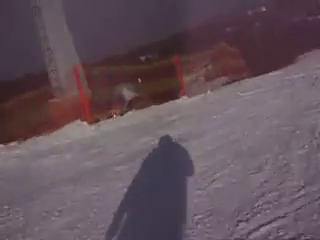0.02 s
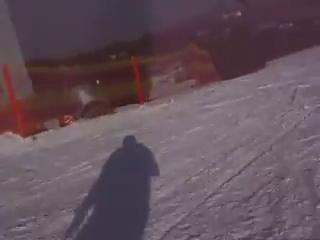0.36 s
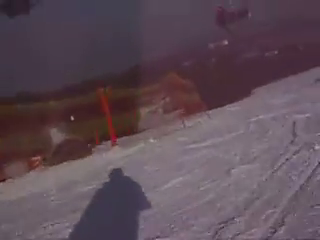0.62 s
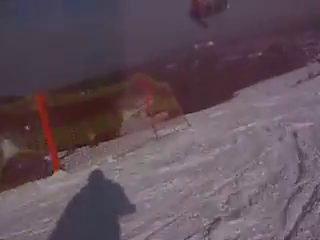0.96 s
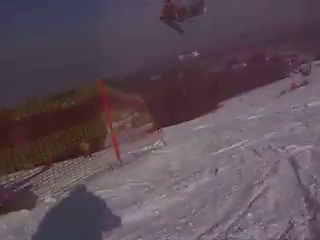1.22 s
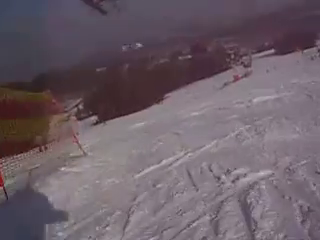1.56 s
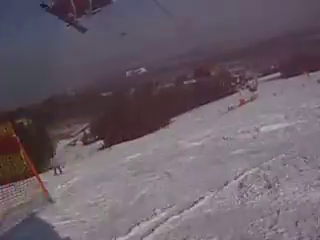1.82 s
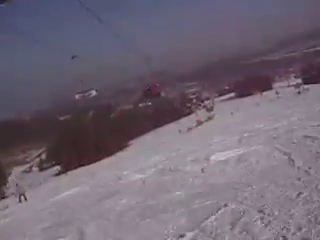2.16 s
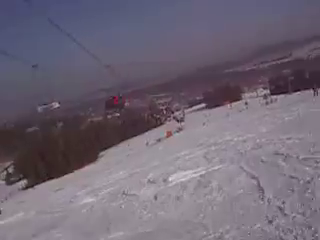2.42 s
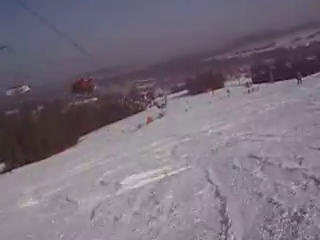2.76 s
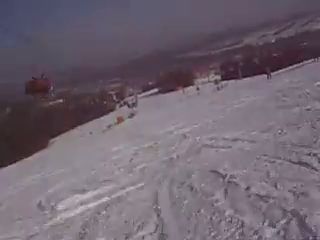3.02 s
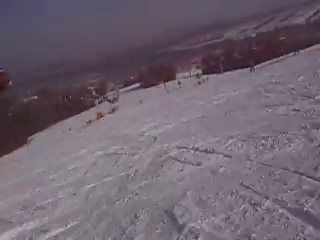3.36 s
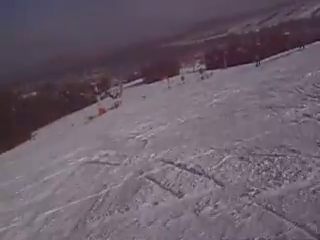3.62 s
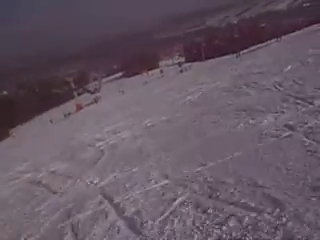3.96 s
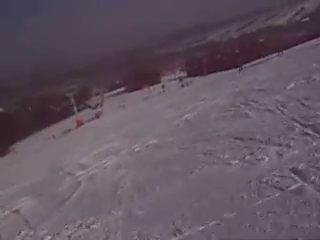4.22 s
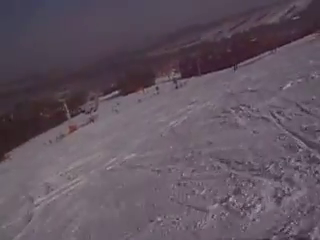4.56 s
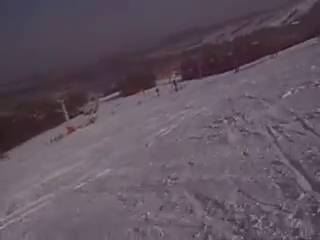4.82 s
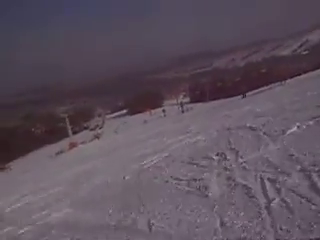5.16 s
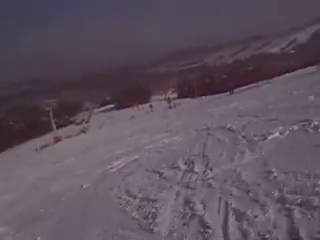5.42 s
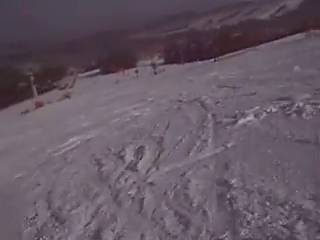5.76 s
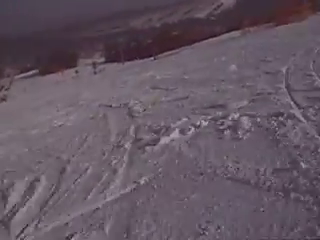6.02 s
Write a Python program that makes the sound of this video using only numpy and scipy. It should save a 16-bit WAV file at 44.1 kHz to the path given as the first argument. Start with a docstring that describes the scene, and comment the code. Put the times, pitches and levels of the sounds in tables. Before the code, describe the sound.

Wind rumbles and flutters hard against a small microphone carried down a ski slope, overloading it with thumps and a thin crackle. Underneath, skis hiss and scrape over hard-packed snow, faint at first and clearer as they gather speed, with a few small knocks and icy rasps. Near the end one violent gust hits, the whole sound drops suddenly, then creeps back up. The tone is dull and muffled.

```python
"""Skiing into the wind

A skier carries a small camera down a hard-packed slope. The skis hiss, scrape and chatter as the
crust breaks under their edges, while wind buffets the microphone and overloads it. One violent gust
trips the recorder's gain control, which ducks everything and creeps back. The recorder is dull:
above about 4 kHz there is only the thin crackle of its own clipping."""
import sys
import numpy as np
from scipy import signal
from scipy.io import wavfile
from scipy.ndimage import uniform_filter1d

SR = 44100
rng = np.random.default_rng(int(sys.argv[2]) if len(sys.argv) > 2 else 0)


def bounce(signal):
    """Save signal as a 16-bit WAV file at the path given by the first command-line argument."""
    frames = np.transpose(np.atleast_2d(signal))
    limited = np.clip(frames, -1, 1)
    pcm = np.round(limited * 32767).astype(np.int16)
    wavfile.write(sys.argv[1], SR, pcm)


N = 272538

# single gusts that hit the microphone port head on: (time [s], push level [dB], pitch [Hz])
HEAD_ON_GUSTS = [(0.126, -5, 420), (0.274, -12, 400), (0.505, -2.5, 300), (0.736, 3, 297), (0.76, 0, 260),
                 (.948, -2, 260), (1.349, -2, 238), (1.998, -3, 280), (2.978, -8, 151), (4.599, -7, 200),
                 (4.629, -12, 298), (4.687, -1.5, 241), (4.9855, 27, 206), (5.352, -2, 240),
                 (5.457, -11, 346), (5.635, -4, 300), (5.818, 4.5, 180)]


def from_db(db):
    """Decibels to gain."""
    return 10 ** (np.asarray(db) / 20)


def unit_power(x):
    """Scale to a mean power of 1."""
    return x / np.sqrt(np.mean(x ** 2) + 1e-20)


def seconds():
    """The time of every sample."""
    return np.arange(N) / SR


def fader(points):
    """Gain along a curve of (time [s], level [dB])."""
    return from_db(np.interp(seconds(), *np.transpose(points)))


def drift(rate):
    """A smooth random wobble that changes about `rate` times a second; spread 1."""
    pole = np.exp(-20 * np.pi * rate / SR)
    slow = signal.lfilter([1], [1, -2 * pole, pole * pole], rng.standard_normal(N // 10 + 4002))[4000:]
    return np.interp(np.arange(N) / 10, np.arange(len(slow)), unit_power(slow))


def steady(x, span_s=0.06):
    """Level a texture to unit power over every short span, leaving the quick lumps in."""
    power = uniform_filter1d(uniform_filter1d(x * x, int(span_s * SR)), int(span_s * SR / 2))
    return x / np.sqrt(np.maximum(power, 1e-20))


def coloured(sources, colour):
    """Shape two unrelated sources with an EQ curve; they feed alternate bands of a filter bank."""
    edges = np.geomspace(22, 4800, 21)
    hz, db = np.transpose(colour)
    out = np.zeros(N)
    for k, (low, high) in enumerate(zip(edges, edges[1:])):
        band = signal.sosfilt(signal.butter(2, [low, high], "band", fs=SR, output="sos"), sources[k % 2])
        out += band * from_db(np.interp(np.log(low * high) / 2, np.log(hz), db))
    return unit_power(out)


def resonate(x, hz, width):
    """A resonance with gain 1 at its peak."""
    pole = np.exp(-np.pi * width / SR)
    feedback = [1, -2 * pole * np.cos(2 * np.pi * hz / SR), pole * pole]
    return signal.lfilter(np.array([1, 0, -1]) * (1 - pole * pole) / 2, feedback, x)


def edge_bite(uneven_db=1.3, attack_share=0.62):
    """How hard the edges bite: a glide over uneven snow, and scrapes that swell and let go."""
    # the hiss of the glide, rising as the skis gather speed: (time [s], relative level [dB])
    glide = [(0, -37.5), (.8, -34.5), (1.3, -33.5), (1.85, -36.5), (2.4, -27.5), (3.1, -29), (3.55, -26),
             (4.02, -31.5), (4.4, -28.5), (5.2, -29), (6.18, -31)]
    # the edges dig in: (time of the hardest bite [s], relative level [dB], release [s])
    scrapes = [(.97, -34.5, .06), (1.12, -34, 0.12), (1.38, -30, .12), (1.70, -32.5, .1), (1.99, -30, 0.1),
               (2.548, -23, 0.062), (2.73, -32, 0.018), (3.28, -21.5, 0.14), (3.72, -22.5, 0.1),
               (4.23, -26.5, 0.14), (4.86, -24.5, 0.1), (5.30, -25.5, 0.057), (5.56, -27.5, .05),
               (5.73, -27.5, 0.13)]
    power = (fader(glide) * from_db(uneven_db * drift(8.4))) ** 2
    for time, db, release in scrapes:
        age = seconds() - time
        width = np.where(age < 0, attack_share * release, release)
        power += from_db(db) ** 2 * np.exp(-(age / width) ** 2)
    return np.sqrt(power)


def skis(bite_db=3.0, grain_db=3.0, grains_per_s=2000, powder=0.62, flex_db=4.4, judder_db=1.0):
    """Crust breaks in countless grains under the edges, over a powder hiss; the edges judder and knock."""
    # the tone of the snow: (frequency [Hz], relative level [dB])
    snow_colour = [(25, -24), (250, 0.5), (500, 6), (900, 3.5), (1300, 3), (1700, -1), (2150, 0),
                   (2550, -3), (3300, -8.5), (4000, -9)]
    # resonances that swell and fade as the skis flex: (frequency [Hz], width [Hz], level [dB])
    ski_modes = [(585, 40, -3), (977, 60, -3), (1908, 60, -2.5), (2210, 89, -8.5), (2940, 140, -7),
                 (3260, 280, -12.5)]
    # knocks over icy lumps: (time [s], level [dB], decay [s])
    knocks = [(0.198, -25, 0.0096), (.577, -30, 0.0043), (.597, -31, 0.0065), (.944, -23, 0.0045),
              (1.694, -28, 0.012), (1.934, -30, 0.0041), (2.057, -10, 0.0021), (2.545, -21.5, 0.013),
              (3.177, -14.5, 0.0033), (4.18, -23, 0.0041), (4.237, -13.5, 0.0079), (4.250, -21, 0.0034),
              (5.277, -23, 0.028)]
    grains = from_db(grain_db * np.minimum(rng.exponential(1, (2, N)), 5)) * rng.choice([-1, 1], (2, N))
    crust = unit_power(grains * (rng.random((2, N)) < grains_per_s / SR))
    snow = coloured(crust + powder * rng.standard_normal((2, N)), snow_colour)
    ring = sum(from_db(db + flex_db * drift(6.4)) * resonate(snow, hz, width)
               for hz, width, db in ski_modes)
    bite = from_db(bite_db) * edge_bite()
    for time, db, decay in knocks:
        age = seconds() - time
        bite += from_db(db) * (age > 0) * np.exp(-np.abs(age) / decay)
    judder = from_db(judder_db * drift(49))
    return bite * steady((snow + ring) * judder)


def ice_rasps():
    """Stick and slip on ice swell briefly around one resonance of the ski."""
    # an edge catches: (time [s], level [dB], half-length [s], frequency [Hz], width [Hz])
    catches = [(1.696, -27.5, 0.025, 1880, 160), (2.576, -18.5, 0.047, 570, 90),
               (4.238, -24.5, 0.019, 2140, 300), (4.836, -26.5, 0.037, 3200, 800)]
    friction = rng.standard_normal(N)
    out = np.zeros(N)
    for time, db, half_length, hz, width in catches:
        swell = np.exp(-((seconds() - time) / half_length) ** 2)
        out += from_db(db) * swell * steady(resonate(friction, hz, width))
    return out


def wind(buffet_db=-12.5, rumble_db=-11.0, flutter_db=-23.0, shed_db=-13, shed_s=0.0035):
    """Turbulence arrives in lumps; each lump or gust presses on the port and sheds smaller eddies."""
    # the tones of deep, middling and small eddies: (frequency [Hz], relative level [dB])
    rumble_colour = [(25, -12), (45, -2.5), (75, 0), (120, -5), (250, -23), (4000, -79.5)]
    buffet_colour = [(25, -26), (50, -17.5), (90, -3), (145, 0.5), (250, -4), (350, -10.5), (500, -21.5),
                     (900, -42), (4000, -63.5)]
    flutter_colour = [(25, -42), (200, -12.5), (350, 1.5), (500, 2.5), (700, -2.5), (1000, -10.5),
                      (1500, -24), (2500, -38.5), (4000, -34)]
    # strength of the airflow over the microphone: (time [s], relative level [dB])
    airflow = [(0.0, -3.5), (0.15, 3.5), (0.3, -5), (0.39, 0.5), (1.17, 2.5), (1.26, -4.5), (1.35, 1.5),
               (1.41, -3.5), (1.53, 2), (1.89, -3.0), (2.07, 2.0), (2.55, -1), (2.82, -5.5), (2.91, -1),
               (3.11, -5), (3.26, -1), (4.04, 0), (4.49, -3), (4.61, 1.5), (4.79, -2.5), (4.97, 1.5),
               (5.24, -2.5), (5.33, 1), (6.17, -3.5)]
    # the deepest eddies swell as the camera turns across the airflow: (time [s], relative level [dB])
    rumble_swells = [(0, -12), (1.0, -15.5), (1.8, -17.5), (2.3, -15.5), (2.8, -4.5), (3.3, -5),
                     (3.7, -1.5), (4.2, -9), (4.7, -4), (5.1, -10), (5.6, -6.5), (6.18, -16)]
    lumps = drift(15.2)
    surge = from_db(1.5 * lumps)
    buffet = steady(coloured(rng.standard_normal((2, N)), buffet_colour) * surge)
    rumble = steady(coloured(rng.standard_normal((2, N)), rumble_colour), span_s=0.27)
    small_eddies = coloured(rng.standard_normal((2, N)), flutter_colour)
    flutter = steady(small_eddies * from_db(3.0 * lumps + 2.5 * drift(130)))
    flow, turn = fader(airflow), fader(rumble_swells)
    # buffet and flutter yield a little to the rumble; small eddies grow faster with the flow
    pressure = flow ** 0.99 * (from_db(buffet_db) / turn ** 0.09 * buffet
                               + from_db(rumble_db) * turn * rumble)
    tearing = flow ** 1.32 * from_db(flutter_db) / turn ** 0.1
    shed = sum(from_db(min(db, 0) + shed_db) * np.exp(-((seconds() - time) / shed_s) ** 2)
               for time, db, _ in HEAD_ON_GUSTS)
    return surge * pressure + (surge * tearing + shed) * flutter


def gusts(suction=0.38, lead_rad=2.1):
    """A head-on gust is a moment of suction, then one push of pressure."""
    out = np.zeros(N)
    for time, db, hz in HEAD_ON_GUSTS:
        phase = np.pi * hz * (seconds() - time)
        out += from_db(db) * (np.exp(-phase ** 2) - suction * np.exp(-(phase + lead_rad) ** 2 / 2))
    return out


def scene():
    """Wind and skis at the single microphone."""
    return (wind() + gusts() + skis() + ice_rasps())[None]


def overflow_snap(trough=0.85):
    """The converter overflows and jumps from rail to rail: a needle in a brief trough."""
    # the cue for the snap: (time [s], level before the band limit [dB], width [s])
    snaps = [(0.9604, 4, 0.000112)]
    out = np.zeros(N)
    for time, db, width in snaps:
        phase = (seconds() - time) / width
        needle = (1 + trough) * np.exp(-phase ** 2 / 2)
        out += from_db(db) * (needle - trough * np.exp(-(phase / 10) ** 2))
    return out


def gain_control(x, threshold_db=5, recovery_db_per_s=17):
    """A peak over the threshold ducks the gain at once; it then recovers at a steady rate."""
    excess = np.maximum(20 * np.log10(np.abs(x) + 1e-9) - threshold_db, 0)
    recovered = recovery_db_per_s * seconds()
    return x * from_db(recovered - np.maximum.accumulate(excess + recovered, axis=-1))


def record(dry, offset=-0.27, rail=0.71, hardness=26.5, headroom=1.003, band_hz=3900, top_hz=15800):
    """A narrow-band recorder with gain control; it sits off centre, so the troughs overload first."""
    biased = gain_control(dry) + offset
    saturated = biased / (1 + np.abs(biased / (headroom * rail)) ** hardness) ** (1 / hardness)
    narrow = signal.sosfilt(signal.butter(18, band_hz, fs=SR, output="sos"), saturated + overflow_snap())
    # what still swings past the rails is cut flat, which adds a thin, bright crackle
    clipped = np.clip(narrow, -rail, rail)
    return signal.sosfilt(signal.butter(12, top_hz, fs=SR, output="sos"), clipped)


dry = scene()
out = record(dry)
bounce(out)
```